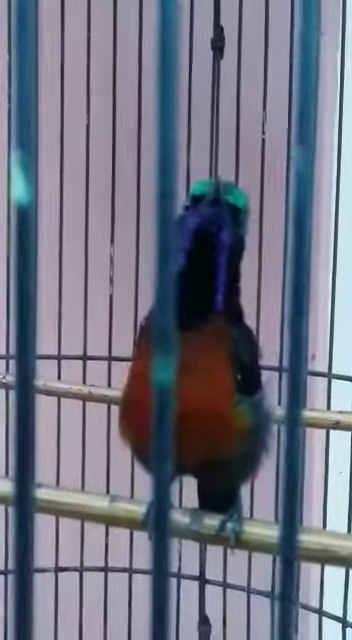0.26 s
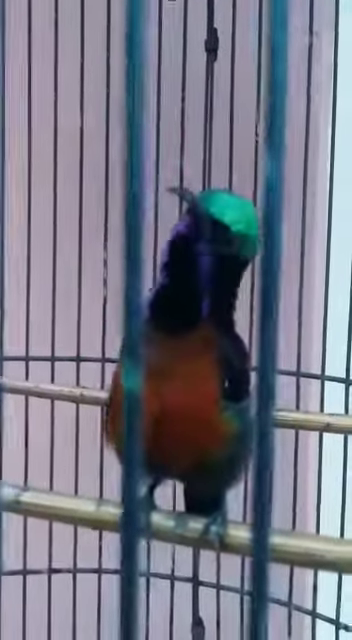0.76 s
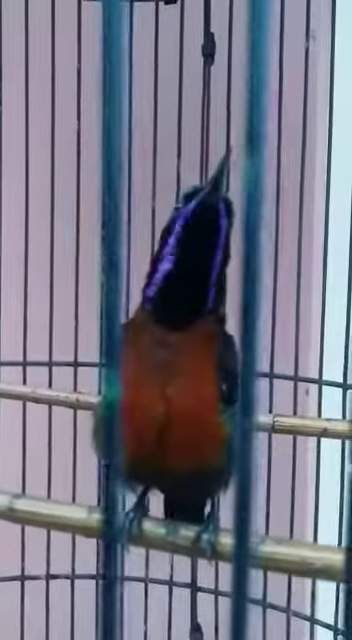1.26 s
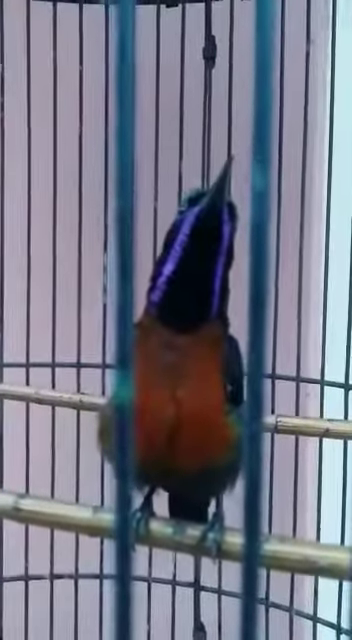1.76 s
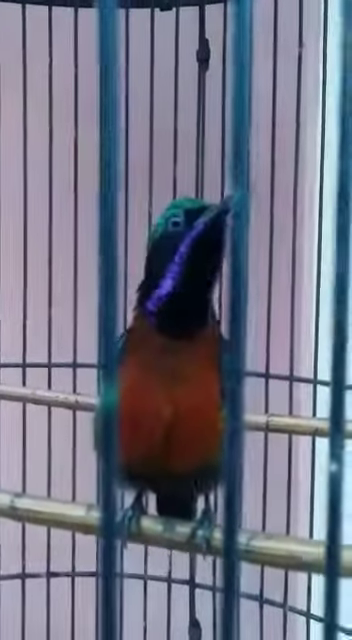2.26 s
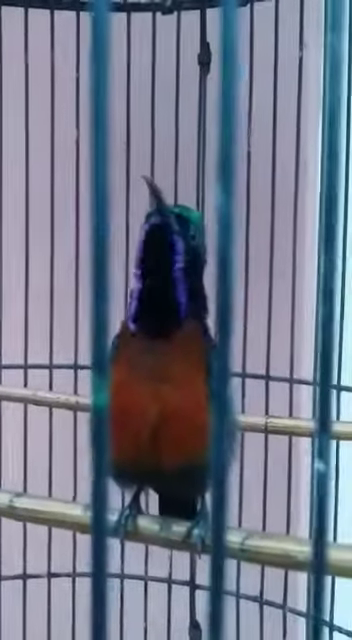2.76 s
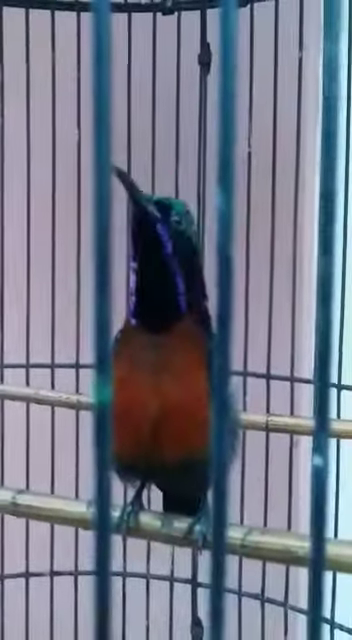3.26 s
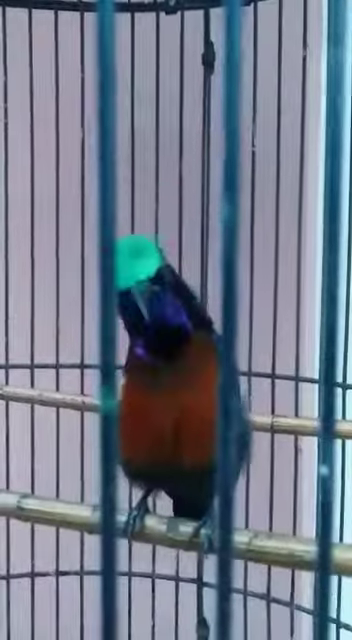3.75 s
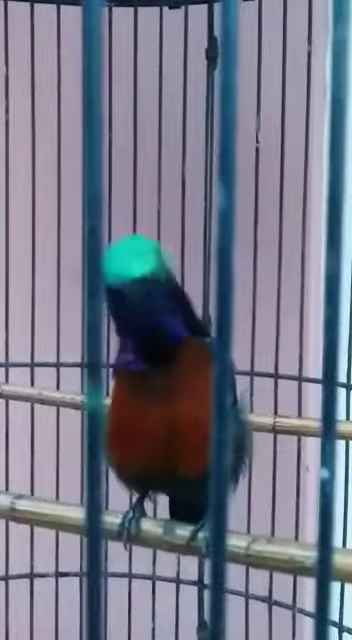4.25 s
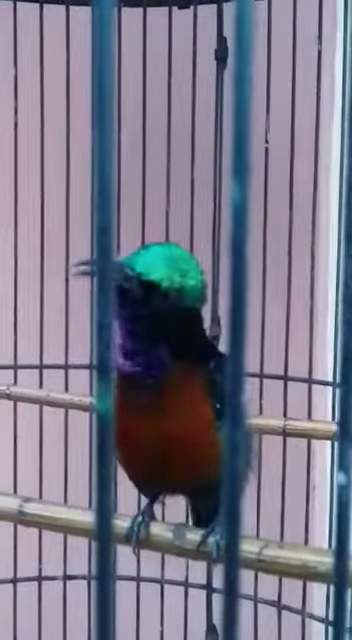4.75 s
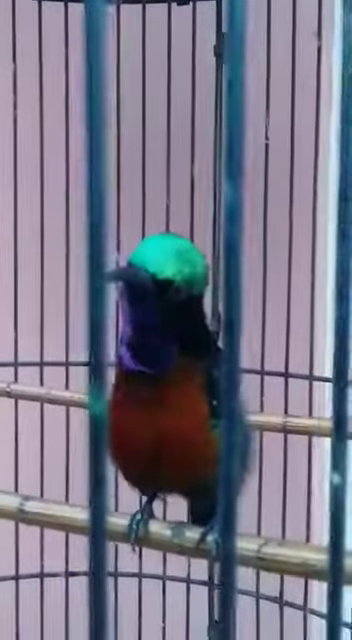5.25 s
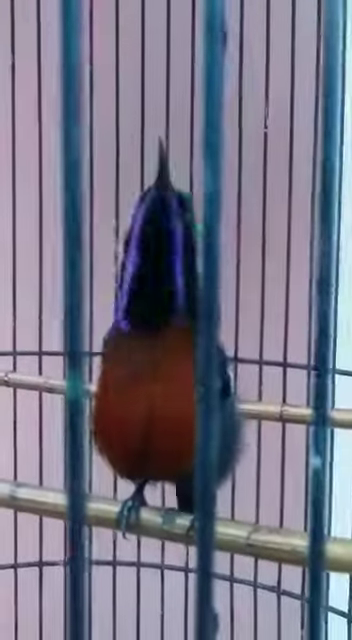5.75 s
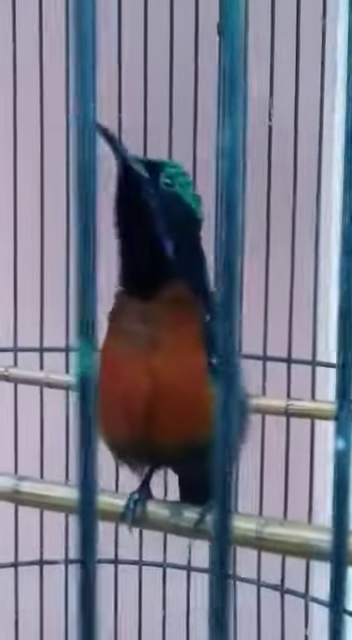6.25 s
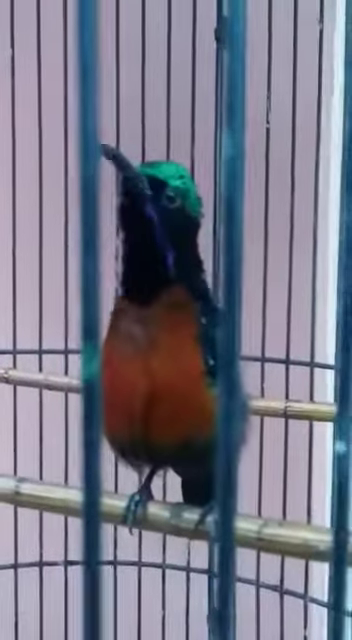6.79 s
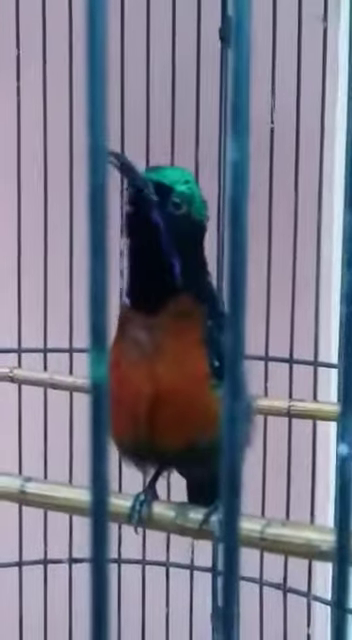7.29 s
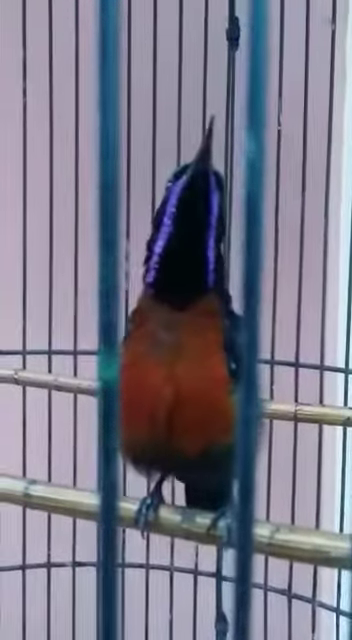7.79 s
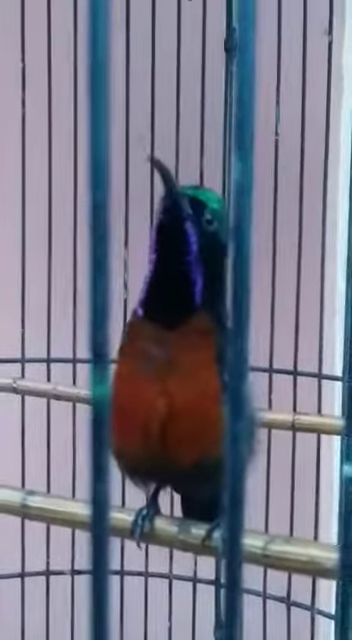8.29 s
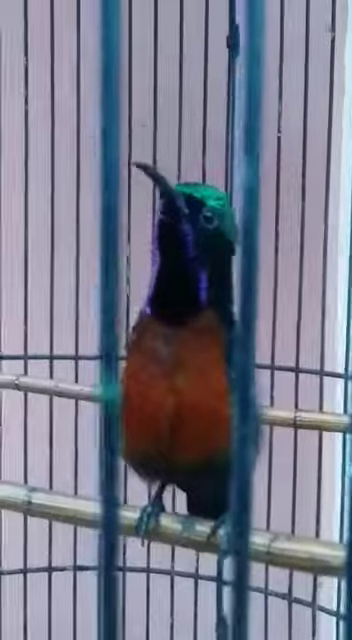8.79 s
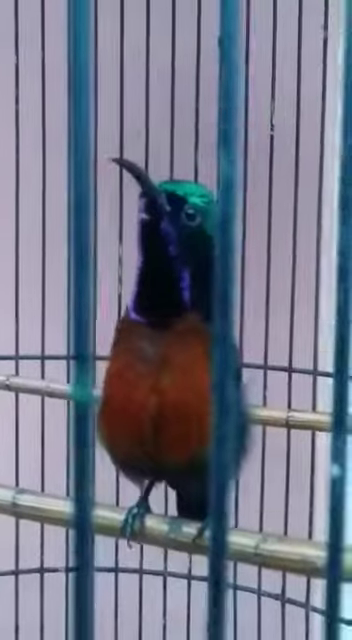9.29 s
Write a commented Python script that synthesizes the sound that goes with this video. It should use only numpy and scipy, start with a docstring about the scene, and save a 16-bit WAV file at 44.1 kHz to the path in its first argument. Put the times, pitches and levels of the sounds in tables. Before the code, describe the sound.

A small bird in a cage sings close to the microphone: quick sliding whistles, raspy scratches and occasional dry beak clicks. The song starts in scattered chirps, thickens into a dense run around two seconds, then breaks into sharp separate bursts with gaps, and grows busy again near the end. One light wooden tap falls in the middle. Faint insects and soft traffic rumble lie behind, with a short dull reflection from nearby walls.

```python
"""A small sunbird sings in a wire cage near a phone: gliding near-sine whistles from both sides of its syrinx,
raspy notes built of tone shards and noise, and filtered clicks for beak snaps. One wooden knock joins it,
and a small yard adds a short dull noise tail to all of these. Behind, without that tail, insects drone in
narrow noise bands, traffic rumbles, a low drone passes, a thin high whine holds and a far-off fowl calls."""
import sys
import numpy as np
from scipy import signal
from scipy.fft import rfft, irfft, next_fast_len
from scipy.io import wavfile
from scipy.ndimage import uniform_filter1d

SR = 44100
rng = np.random.default_rng(int(sys.argv[2]) if len(sys.argv) > 2 else 0)


def int16_out(signal):
    """Quantize to a 16-bit WAV file."""
    q = np.round(np.clip(np.atleast_2d(signal).T, -1, 1) * 32767)
    wavfile.write(sys.argv[1], SR, q.astype(np.int16))


N = 420273
T = np.arange(N) / SR  # s
TOP_HZ = 15850  # upper limit of the microphone

# Background air, traffic into microphone hiss: (frequency [Hz], relative gain [dB])
AIR_SPECTRUM = [(30, -44.5), (60, 1), (95, 2.5), (300, -10), (950, -22), (1500, -15.5), (3600, -22.5),
                (5200, -29.5), (6000, -33.5), (8000, -45.5), (16000, -35)]
# Slow rise and fall of the traffic: (time [s], swell [dB])
TRAFFIC_SWELL = [(0, 2), (1.5, 4), (5.5, 0.5), (7.5, 3), (9.53, 1)]
# Passing low drone: (from [s], to [s], centre [Hz], width [Hz], level [dB])
PASSING_DRONE = (1.75, 3.1, 624, 159, -65)
AIR_DB = -58
WHINE_HZ, WHINE_PEAK_DB = 14000, -79.5

# Insect chorus, the two lower bands: (time [s], low band level [dB], middle band level [dB])
CHORUS_LEVELS = [(0, -99, -70), (.5, -65, -57), (1.7, -61, -64), (2.597, -56, -55.5), (3.5, -62.5, -60),
                 (4.0, -67.5, -67.5), (5.3, -65, -67.5), (6.5, -57.5, -54.5), (7.7, -64.5, -60.5),
                 (9.199, -62, -67.5)]
# Insect bands, low to high: (centre [Hz], width [Hz])
INSECT_BANDS = [(2300, 557), (4500, 530), (6600, 480)]
HIGH_CHORUS_DB = -66.5  # the top band has no slow wander
BLUR_DB = -7  # broad blur of insects against the low band

# Far-off fowl: (start [s], length [s], pitch [Hz], fundamental peak level [dB])
FOWL_CALL = (3.90, .22, 472, -66)

YARD_T60_S, YARD_DB, YARD_GAP_S = 0.16, -17.5, 0.0029

# Ringing modes of the knocked wood: (frequency [Hz], relative level [dB], decay by 60 dB [s])
KNOCK_MODES = [(623, 1.7, 0.063), (1466, 0.5, 0.022), (2310, 6.7, 0.012)]
KNOCK_S, KNOCK_DB = 3.657, -31.5

# Beak snaps: (time [s], impulse level before the filters [dB])
BEAK_SNAPS = [(1.788, -24), (4.802, -10), (5.0613, -16), (5.367, -32), (5.3921, -13.5), (5.686, -19.5),
              (5.938, -25), (8.519, -37)]
SNAP_BODY_DB = 6  # broad click against the bright one
BUZZ_DB, BUZZ_S = -20, 0.048  # throat buzz around a snap

# Raspy notes: (start [s], length [s], level [dB], 5-8 kHz band against 2-4 kHz band [dB])
RASP_NOTES = [(0.029, 0.037, -31.5, 3), (0.354, 0.031, -48, 4), (0.406, 0.033, -48.5, 2),
              (0.545, 0.041, -36.5, -4), (0.635, 0.082, -48, -5), (0.91, 0.055, -47.5, -1),
              (1.172, 0.11, -45, -2.5), (1.455, 0.056, -39.5, -7), (1.544, 0.046, -41, -4),
              (1.725, 0.059, -45.5, 1.5), (1.95, 0.11, -32, -1.5), (2.083, 0.072, -36.5, -7),
              (2.201, 0.068, -25.5, -13), (2.258, 0.12, -34.5, -22), (3.168, 0.032, -47, -2),
              (3.347, 0.047, -35.5, 4.5), (3.69, 0.038, -36, -1), (3.88, 0.015, -37.5, -28),
              (4.504, 0.021, -24, -4), (4.782, 0.025, -29.5, -6.5), (5.04, 0.027, -37, -4.5),
              (5.384, 0.009, -36.5, 4), (5.572, 0.021, -34.5, -18), (5.667, 0.034, -44.5, -4),
              (5.933, 0.065, -42.5, -6.5), (6.724, 0.033, -27.5, -2.5), (6.845, 0.039, -35.5, -10.5),
              (7.108, 0.04, -33, -9.5), (7.339, 0.031, -31.5, -1.5), (7.456, 0.017, -27.5, -9),
              (7.5, 0.085, -44.5, -7.5), (7.992, 0.032, -30, -6), (8.405, 0.055, -35.5, -5),
              (8.49, 0.1, -34, -6), (8.907, 0.045, -32, -6), (9.352, 0.032, -30.5, -1)]
# Hissier phrases: (from [s], to [s], top hiss against the rasp [dB])
HISSY_PHRASES = [(.3, 1, -15), (1.75, 2.15, -10.5), (2.24, 3.4, -26), (4.4, 4.9, -18.5), (5, 5.5, -12),
                 (5.6, 6, -7), (8.3, 9.5, -19)]
TOP_HISS_DB = -33  # against the rasp, elsewhere
SHARD_S = 0.012
BREATH = 0.5  # air against shards in a rasp

# Scratchy syllables sung by both sides at once: (start [s], length [s], level [dB])
SCRATCH_NOTES = [(0.989, 0.11, -47.5), (2.993, 0.1, -50), (6.948, 0.099, -45.5), (9.441, 0.095, -48)]
# Pitch path of each side in a scratch: (share of length [0-1], pitch [Hz])
SCRATCH_PATHS = [
    [(0, 2560), (.45, 3230), (1, 3400)],
    [(0, 1960), (.55, 2810), (1, 3050)],
]
# Beating of the two sides: (rate [Hz], depth [share])
SCRATCH_BEAT = (400, 0.6)
SCRATCH_SECOND_DB, SCRATCH_ROUGH, SCRATCH_AIR_DB, SCRATCH_FADE_DB = 4, 0.85, -7.5, -9.5

# Chirps bend from a start pitch to a turn, where they are loudest, and on to an end pitch; they may overlap:
# (start [s], rise [s], fall [s], start [Hz], turn [Hz], end [Hz], level at turn [dB], second harmonic [dB])
CHIRP_NOTES = [(0.012, 0.011, 0.0075, 4580, 5830, 5080, -25, -56),
               (0.533, 0.0083, 0.015, 2365, 2540, 2210, -28, -11.5),
               (0.564, 0.024, 0.0034, 2020, 2930, 2400, -26.5, -9.5),
               (0.584, 0.0075, 0.014, 3330, 4116, 2940, -26, -31),
               (1.068, .022, .01, 6100, 6740, 7400, -37.5, -40),
               (1.06, 0.021, 0.02, 4060, 3763, 4100, -30.5, -6),
               (1.328, 0.028, 0.018, 4300, 5195, 5470, -31, -44),
               (1.41, 0.023, 0.052, 2154, 2113, 1905, -44.5, -28),
               (1.548, 0.0062, 0.016, 4550, 4190, 3670, -28.5, -29),
               (1.577, 0.0069, 0.0087, 5570, 5230, 4200, -24, -48),
               (1.925, 0.011, 0.016, 6500, 6570, 5300, -26.5, -40),
               (1.943, 0.0028, 0.033, 5130, 5080, 5420, -19.5, -12),
               (1.97, 0.027, 0.0088, 2120, 2110, 2070, -29, -6.5),
               (1.969, 0.0031, 0.055, 3695, 3800, 4520, -22, -36),
               (1.998, 0.017, 0.029, 4980, 6270, 6260, -23, -1),
               (2.002, 0.051, 0.022, 5200, 4486, 4520, -21, -35),
               (2.039, 0.0071, 0.021, 2637, 2530, 2525, -18.5, -20),
               (2.054, 0.02, 0.013, 2900, 3750, 3750, -19, -25),
               (2.076, 0.0044, 0.02, 5700, 5050, 3440, -19, -28),
               (2.092, 0.0012, 0.015, 2860, 2980, 3220, -17.5, -19.5),
               (2.101, 0.0021, 0.022, 5200, 5030, 4790, -18.5, -23),
               (2.16, 0.028, 0.016, 1580, 2360, 2320, -27.5, -11.5),
               (2.173, .009, 0.061, 4600, 5630, 4560, -31, -47),
               (2.185, 0.03, 0.014, 4310, 3900, 4130, -20, -16.5),
               (2.228, 0.026, 0.022, 2350, 2440, 2924, -22.5, -9),
               (2.279, 0.018, 0.0056, 5030, 4890, 4980, -23.5, -11),
               (2.411, 0.0033, 0.033, 6100, 6510, 6780, -32, -7),
               (3.335, 0.021, 0.0023, 4500, 5050, 5100, -34.5, -49),
               (3.355, 0.017, 0.016, 2470, 5780, 3150, -24, -37),
               (3.366, 0.012, 0.014, 2814, 3706, 2260, -25.5, -2),
               (3.689, 0.018, 0.026, 3480, 4180, 2134, -20, -18),
               (4.14, 0.03, 0.024, 5700, 4600, 4260, -48.5, -47),
               (5.243, 0.024, 0.024, 5600, 4750, 4000, -49.5, -53),
               (4.514, .036, 0.0028, 2128, 7410, 7470, -23.5, -31),
               (5.172, 0.014, 0.032, 4540, 7110, 5120, -29.5, -28),
               (5.312, 0.017, 0.035, 4400, 7470, 5560, -33.5, -34),
               (5.471, 0.022, 0.026, 2180, 8190, 2200, -34.5, -46),
               (5.59, 0.006, 0.02, 5480, 7170, 4480, -24.5, -25),
               (5.754, 0.015, 0.014, 5800, 7380, 5020, -31.5, -25),
               (5.984, 0.024, 0.017, 4020, 3193, 3400, -28, -19.5),
               (1.069, .024, .008, 2144, 2850, 3050, -42.5, -29),
               (6.855, .02, 0.0216, 864, 1107, 864, -53, 2),
               (6.735, 0.0033, 0.013, 4010, 4105, 2330, -26, -16),
               (7.118, 0.015, 0.014, 6780, 6700, 4430, -24.5, -45),
               (7.122, 0.0037, 0.017, 4846, 5090, 2110, -19.5, -43),
               (7.207, 0.012, 0.021, 4230, 4190, 3670, -42, -35),
               (7.252, 0.034, 0.022, 2800, 5240, 5770, -32.5, -35),
               (7.346, 0.012, 0.019, 2554, 7040, 2660, -19, -45),
               (7.469, 0.0092, 0.027, 2110, 7530, 3030, -25, -41),
               (7.583, .045, 0.022, 3360, 3860, 3800, -46, -17),
               (8.018, 0.0026, 0.037, 5420, 5520, 5500, -33.5, -68),
               (8.394, 0.018, 0.02, 2550, 3104, 3070, -21, -12.5),
               (8.479, .022, 0.04, 2900, 3607, 3537, -17.5, -12),
               (8.555, 0.042, 0.026, 4310, 4690, 4500, -30.5, -29),
               (8.56, 0.05, 0.0066, 2190, 2300, 2340, -39.5, -29),
               (8.717, 0.011, 0.039, 2020, 3810, 3670, -34.5, -23),
               (8.842, 0.02, 0.031, 4500, 6310, 6660, -26.5, -3),
               (8.899, 0.0065, 0.015, 2690, 4060, 3100, -36, -21),
               (8.936, 0.02, 0.045, 2350, 2214, 2390, -37.5, -9),
               (8.914, 0.011, 0.016, 3600, 4140, 3820, -27, -25),
               (8.953, .008, 0.026, 4150, 4016, 3970, -27.5, -13.5),
               (9.357, 0.016, 0.031, 2264, 3140, 6250, -26, -5.5),
               (9.372, 0.018, 0.011, 2950, 6910, 6080, -23.5, -27)]
BEND = 1.6  # 1 = straight glides, 2 = rounded arches
EFFORT_BEND = 2.62  # the same for the level
# how far long chirps start and end under the turn; shorter ones change less
SWELL_DB, FADE_DB, EFFORT_S = -12, -10, 0.0074
# Whistles with freer bends, drawn point by point:
# (second harmonic [dB], [(time [s], pitch [Hz], level [dB]), ..])
FREE_WHISTLES = [(-27.5, [(0.016, 2907, -34), (.024, 4070, -25), (0.033, 4267, -15), (0.053, 4270, -20),
                 (0.065, 1983, -35.5)]), (-6.5, [(0.788, 2386, -39), (0.803, 2890, -37),
                 (0.83, 2625, -25.5), (0.85, 2658, -20.5), (0.881, 3080, -27.5), (0.893, 2040, -33.5)]),
                 (-12.5, [(1.248, 1990, -39), (1.26, 1802, -43.5), (1.277, 2248, -28), (1.296, 2304, -24),
                 (1.31, 1894, -37.5), (1.326, 2360, -24)]), (-35.5, [(1.872, 3900, -44),
                 (1.895, 5100, -25.5), (1.925, 5235, -21.5), (1.939, 5550, -20), (1.943, 4314, -19.5),
                 (1.957, 4130, -13.5), (1.967, 3166, -25), (1.975, 2050, -30.5)]),
                 (-23.5, [(2.224, 4458, -18), (2.3, 4244, -22.5), (2.33, 3945, -24.5), (2.397, 4020, -27)]),
                 (-28.5, [(2.496, 5280, -34.5), (2.528, 4540, -26), (2.546, 4630, -55), (2.556, 4530, -29),
                 (2.6, 3797, -24.5), (2.67, 3550, -32.5), (2.69, 3205, -30), (2.722, 2956, -36),
                 (2.773, 2908, -29.5), (2.786, 2738, -20), (2.805, 2930, -48)]), (-27, [(4.508, 3400, -24),
                 (4.52, 4280, -24.5), (4.529, 6760, -19), (4.535, 7540, -24), (4.543, 6690, -13)]),
                 (9, [(4.762, 1138, -47.5), (4.776, 1745, -44.5), (4.786, 3510, -57)]),
                 (-25, [(4.776, 1742, -27), (4.789, 5200, -34.5), (4.799, 6030, -29.5), (4.815, 4410, -31),
                 (4.825, 4120, -20), (4.838, 3820, -29)]), (-30, [(5.028, 2505, -39), (5.036, 4560, -31),
                 (5.044, 5000, -30), (5.056, 4330, -28), (5.068, 4280, -28.5), (5.088, 3020, -40.5)]),
                 (-30, [(6.112, 3800, -33), (6.128, 3594, -25), (6.152, 3065, -22.5), (6.163, 3420, -26),
                 (6.18, 2620, -24.5), (6.197, 2680, -53)]), (-34, [(6.277, 2610, -45), (6.285, 3200, -27),
                 (6.298, 3233, -20), (6.319, 3590, -27), (6.335, 3360, -25), (6.349, 2150, -39)]),
                 (-11, [(8.002, 2167, -27.5), (8.016, 2260, -29), (8.09, 2239, -29), (8.104, 2455, -24)]),
                 (-26, [(8.104, 2430, -22.5), (8.128, 3590, -32), (8.182, 3993, -21.5),
                 (8.223, 3812, -23.5), (8.242, 2860, -38)]), (-28, [(8.42, 3500, -24.5), (8.426, 5330, -19),
                 (8.46, 5340, -22.5), (8.47, 5860, -19), (8.478, 4890, -18.5), (8.494, 5700, -28.5)]),
                 (-15, [(8.742, 5350, -28.5), (8.752, 5040, -22.5), (8.795, 3960, -30.5),
                 (8.825, 2856, -30.5), (8.889, 2684, -47.5)])]
# Harsher phrases: (from [s], to [s], roughness [0-1.5])
HARSH_PHRASES = [(1.88, 2.223, 0.74), (1.32, 1.45, 0.9), (4.1, 4.2, 1.4), (5.24, 5.3, 1.4),
                 (8.7, 7.3, 0.98), (6.7, 7.5, 0.92), (8.39, 9.1, 1.07)]
CLEAR_ROUGH = 0.46  # roughness of a clean whistle
WAVER = 0.018  # pitch unsteadiness at roughness 1, share
# Fluttering passage: (from [s], to [s], flutter [Hz], depth [share])
TRILL_FLUTTER = (0.772, 0.828, 290, 1.2)
# Throat and microphone on the added tones: (frequency [Hz], gain [dB])
HEAD_RESPONSE = [(6500, 4.5), (8000, -14), (10500, -26), (13000, -18.5), (16000, -5)]
OVERTONE_STEP_DB = -13.5  # each harmonic above the second
COUPLING = 0.1  # strength of the pull between the two sides
OVERDRIVE = 9.7  # cubic distortion of loud notes, treble only


def undb(db):
    """Decibels to amplitude."""
    return 10 ** (np.asarray(db) / 20)


def unit(x):
    """Scales to rms 1."""
    return x / np.sqrt(np.mean(x ** 2))


def noise():
    """White noise over the whole scene."""
    return rng.standard_normal(N)


def on_log(hz, table):
    """Reads (Hz, dB) points on a log axis."""
    f, db = np.transpose(table)
    return np.interp(np.log(np.maximum(hz, 1)), np.log(f), db)


def bandpass(x, lo_hz, hi_hz):
    """Steep band-pass that keeps the level in the band."""
    return signal.sosfilt(signal.butter(5, [lo_hz, hi_hz], "bandpass", fs=SR, output="sos"), x)


def band(x, lo_hz, hi_hz):
    """Steep band-pass, rms 1."""
    return unit(bandpass(x, lo_hz, hi_hz))


def walk(rate):
    """Random levels held 1 / rate s and slewed twice; rms 1."""
    k = int(SR / rate)
    steps = np.repeat(rng.standard_normal(N // k + 1), k)
    return unit(uniform_filter1d(uniform_filter1d(steps, k), k)[:N])


def span(start, length):
    """Samples from start for length seconds."""
    return slice(max(int(start * SR), 0), min(int((start + length) * SR), N))


def hump(t, middle, half):
    """Flat-topped swell around middle, down to 1/e half seconds away."""
    return np.exp(-((t - middle) / half) ** 4)


def rumble(swell_db=1.1):
    """Traffic rumble fading into microphone hiss: noise shaped by a spectrum, slowly swelling."""
    size = next_fast_len(N)
    gain = undb(on_log(np.arange(size // 2 + 1) * SR / size, AIR_SPECTRUM))
    shaped = unit(irfft(rfft(rng.standard_normal(size)) * gain, size)[:N])
    swell = np.interp(T, *np.transpose(TRAFFIC_SWELL)) + swell_db * walk(2.51)
    return shaped * undb(AIR_DB + swell)


def drone():
    """A low drone passes: a narrow noise band rises and falls."""
    start, end, hz, width, db = PASSING_DRONE
    return undb(db) * band(noise(), hz - width / 2, hz + width / 2) * hump(T, (start + end) / 2, (end - start) / 2)


def whine():
    """A thin steady sine high up."""
    return undb(WHINE_PEAK_DB) * np.sin(2 * np.pi * WHINE_HZ * T)


def insects(flicker_db=3.0, wander_db=4.0):
    """Many far insects blur into narrow bands that flicker; the lower two come and go."""
    s, *lower = np.transpose(CHORUS_LEVELS)
    levels = [np.interp(T, s, db) + wander_db * walk(5.0) for db in lower] + [HIGH_CHORUS_DB]
    out = undb(levels[0] + BLUR_DB) * band(noise(), 2600, 6000)
    for (hz, width), db in zip(INSECT_BANDS, levels):
        out += undb(db + flicker_db * walk(40)) * band(noise(), hz - width / 2, hz + width / 2)
    return out


def crow():
    """A far-off fowl: a faint held call of three harmonics."""
    start, length, hz, db = FOWL_CALL
    call = sum(np.sin(2 * np.pi * k * hz * T) / k for k in range(1, 4))
    return undb(db) * hump(T, start + length / 2, length / 2) * call


def yard(x):
    """Near walls return a dense tail, duller than the direct sound."""
    t = T[:SR // 2]
    tail = rng.standard_normal(len(t)) * np.exp(-np.log(1000) * t / YARD_T60_S) * (t > YARD_GAP_S)
    tail = signal.sosfilt(signal.butter(2, 5500, fs=SR, output="sos"), tail)
    return x + undb(YARD_DB) * signal.fftconvolve(x, tail / np.sqrt(np.sum(tail ** 2)))[:N]


def knock(contact_s=0.00082):
    """A light tap on hollow wood: decaying modes; the soft contact rounds the start."""
    t = np.maximum(T - KNOCK_S, 0)
    ring = sum(undb(db) * np.sin(2 * np.pi * hz * t) * np.exp(-np.log(1000) * t / t60)
               for hz, db, t60 in KNOCK_MODES)
    return undb(KNOCK_DB) * ring * np.sin(np.pi / 2 * np.minimum(t / contact_s, 1)) ** 2


def snaps():
    """The beak shuts: one sharp click, bright on top, inside a short throat buzz."""
    kick = np.zeros(N)
    for s, db in BEAK_SNAPS:
        kick[int(s * SR)] = undb(db)
    swell = signal.fftconvolve(kick, np.hanning(int(BUZZ_S * SR)), "same")
    buzz = swell * band(noise(), 3360, 3900)
    bright, body = bandpass(kick, 12500, 16000), bandpass(kick, 1200, 6800)
    return bright + undb(SNAP_BODY_DB) * body + undb(BUZZ_DB) * buzz


def shards(lo_hz, hi_hz, count, glide=0.2, scatter_db=6):
    """Broken bits of whistle: short gliding tones of scattered time, pitch and size, count a second; rms 1."""
    draw = rng.random((int(count * N / SR), 4))  # time, pitch, glide, size
    u = np.linspace(0, 1, int(SHARD_S * SR))
    hz = lo_hz * (hi_hz / lo_hz) ** draw[:, 1:2] * (1 + glide * (2 * draw[:, 2:3] - 1) * (u - .5))
    bits = np.sin(2 * np.pi * np.cumsum(hz, axis=1) / SR) * np.sin(np.pi * u) ** 2
    bits *= undb(-scatter_db * draw[:, 3:])
    where = (draw[:, :1] * N).astype(int) + np.arange(len(u))
    return unit(np.bincount(where.ravel(), bits.ravel(), N + len(u))[:N])


def rasps(clicks_per_s=250, tear_db=4.5, spread=0.7, chest=0.019):
    """Unsteady membranes: shards of tone and air in two throat bands, with a hiss on top."""
    slaps = unit((rng.random(N) < clicks_per_s / SR) * noise())
    hiss = noise()
    rough_air = hiss + slaps
    low = shards(2267, 4704, count=700) + BREATH * band(rough_air, 1810, 5300)
    low = unit(low + chest * band(rough_air, 890, 1690))
    high = unit(shards(4500, 7600, count=700) + BREATH * band(rough_air, 4600, 8200))
    top = band(hiss, 13300, .45 * SR)
    # each band tears on its own
    low, high, top = (unit(x * undb(tear_db * walk(80))) for x in (low, high, top))
    # air leaks through each scratch
    breathy = [(s, length, db + SCRATCH_AIR_DB, 3.5) for s, length, db in SCRATCH_NOTES]
    out = np.zeros(N)
    for start, length, level_db, tilt_db in list(RASP_NOTES) + breathy:
        top_db = max([TOP_HISS_DB] + [db for a, b, db in HISSY_PHRASES if a < start < b])
        at = span(start - length, 3 * length)
        swell = hump(T[at], start + length / 2, spread * length)
        low_gain, high_gain = undb([-tilt_db / 2, tilt_db / 2])
        mix = (low_gain * low[at] + high_gain * high[at]) / np.hypot(low_gain, high_gain)
        out[at] += undb(level_db) * swell * (mix + undb(top_db) * top[at])
    return out


def chirp(start, rise, fall, start_hz, turn_hz, end_hz, level_db):
    """Rows (s, Hz, dB) of one chirp: pitch eases into its turn while effort swells, then both let go."""
    u = np.linspace(-1, 1, num=17)  # the turn is at 0
    side = np.where(u < 0, rise, fall)
    hz = turn_hz + (np.where(u < 0, start_hz, end_hz) - turn_hz) * np.abs(u) ** BEND
    drop_db = np.where(u < 0, SWELL_DB, FADE_DB) * (1 - np.exp(-side / EFFORT_S))
    return np.transpose([start + rise + u * side, hz, level_db + drop_db * np.abs(u) ** EFFORT_BEND])


def songs():
    """All whistles as (second harmonic dB, roughness, rows); a scratch is two sides, softer at both ends."""
    notes = [(row[-1], chirp(*row[:-1])) for row in CHIRP_NOTES] + list(FREE_WHISTLES)
    out = []
    for second_db, rows in notes:
        rough = max([CLEAR_ROUGH] + [r for a, b, r in HARSH_PHRASES if a < rows[0][0] < b])
        out.append((second_db, rough, rows))
    for s, length, db in SCRATCH_NOTES:
        for path in SCRATCH_PATHS:
            rows = [(s + share * length, hz, db + SCRATCH_FADE_DB * abs(2 * share - 1)) for share, hz in path]
            out.append((SCRATCH_SECOND_DB, SCRATCH_ROUGH, rows))
    return out


def trill():
    """Level gain that flutters in the trill and beats in each scratch."""
    gain = np.ones(N)
    beats = [(s, s + length, *SCRATCH_BEAT) for s, length, _ in SCRATCH_NOTES]
    for start, end, rate_hz, depth in [TRILL_FLUTTER] + beats:
        gain += depth * np.sin(2 * np.pi * rate_hz * T) * hump(T, (start + end) / 2, (end - start) / 2)
    return gain


def couple(x):
    """The two sides push on each other: sum and difference tones leave through the throat."""
    size = next_fast_len(N)
    hz = np.arange(size // 2 + 1) * SR / size
    mixed = COUPLING * rfft(x ** 2, size) * (hz > 1500) + OVERDRIVE * rfft(x ** 3, size) * (hz > 8000)
    return x + irfft(mixed * undb(on_log(hz, HEAD_RESPONSE)), size)[:N]


def whistles(edge_s=0.0029, glide_s=0.0044, wobble=0.0047, rough_db=4.0, fuzz=0.32):
    """Near-sine membranes with a few harmonics; all sway, rough notes waver in pitch and break up in level."""
    out, drift, sway, flutter = np.zeros(N), walk(500), walk(70), walk(600)
    breath = walk(1300)  # turbulent air blurs rough tones
    trill_gain = trill()
    for second_db, rough, rows in songs():
        s, pitch, level_db = np.transpose(rows)
        rough = np.clip(rough, 0, 2)
        at = span(s[0] - edge_s, s[-1] - s[0] + 2 * edge_s)
        t = T[at]
        own = rng.integers(N - len(t)) + np.arange(len(t))  # every note shakes in its own way
        # muscles round the corners of a glide
        hz = uniform_filter1d(np.interp(t, s, pitch), int(glide_s * SR), mode="nearest")
        hz = hz * (1 + WAVER * rough * drift[own] + wobble * sway[own])
        phase = 2 * np.pi * np.cumsum(hz) / SR
        tone = np.sin(phase)
        for k in range(2, 7):
            harmonic_db = second_db + (k - 2) * OVERTONE_STEP_DB + on_log(k * hz, HEAD_RESPONSE)
            tone += (k * hz < TOP_HZ) * undb(harmonic_db) * np.sin(k * phase)
        edge = np.clip(np.minimum(t - t[0], t[-1] - t) / (2 * edge_s), 0, 1)
        blur = 1 + fuzz * rough ** 2 * breath[own]
        level = undb(np.interp(t, s, level_db) + rough_db * rough * np.minimum(flutter[own], 1))
        out[at] += np.sqrt(2) * tone * edge * trill_gain[at] * blur * level
    return couple(out)


def scene():
    """Bird and knock sound in the yard; the background joins without its echo."""
    background = rumble() + drone() + whine() + insects() + crow()
    return (background + yard(knock() + snaps() + rasps() + whistles()))[None]


def record(dry):
    """The phone rounds the loudest peaks and cuts the top."""
    rounded = np.tanh(1.2 * dry) / 1.2
    return signal.sosfilt(signal.ellip(10, .2, 60, TOP_HZ, fs=SR, output="sos"), rounded)


dry = scene()
out = record(dry)
int16_out(out)
```